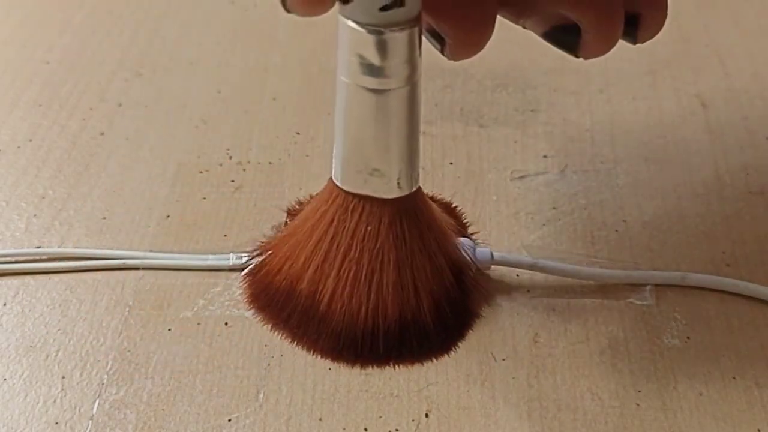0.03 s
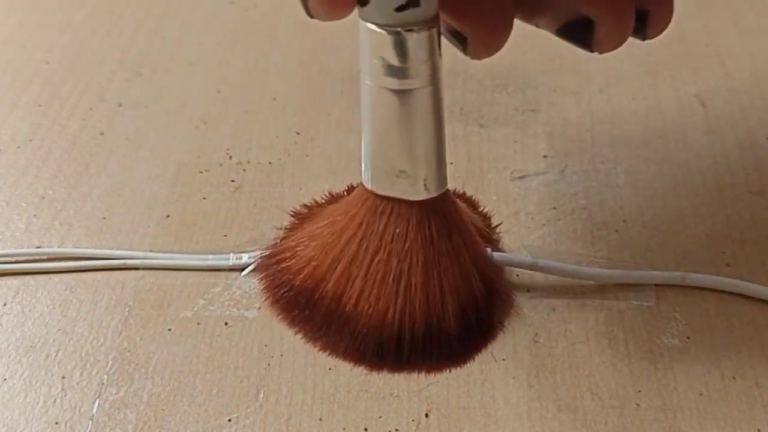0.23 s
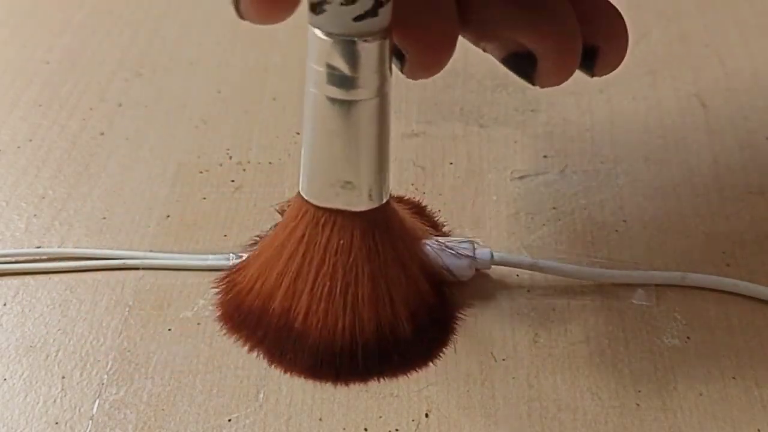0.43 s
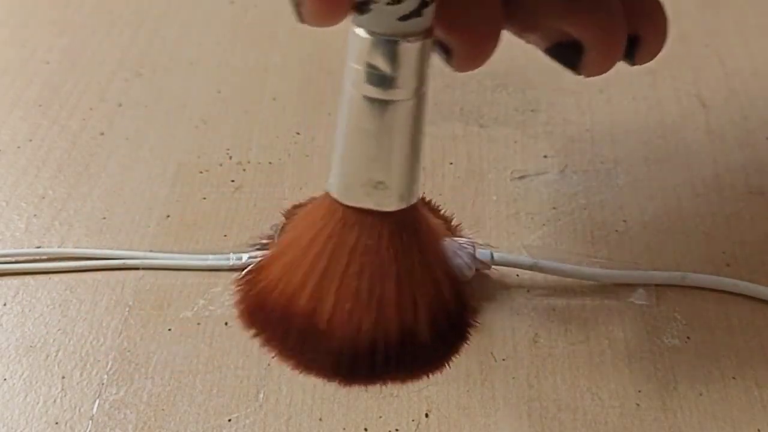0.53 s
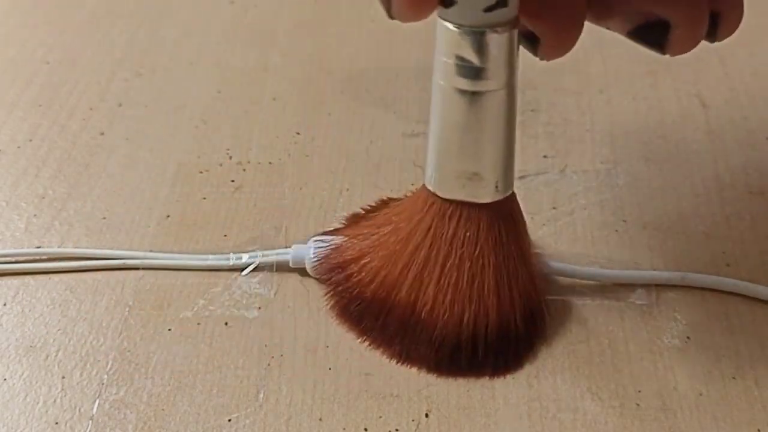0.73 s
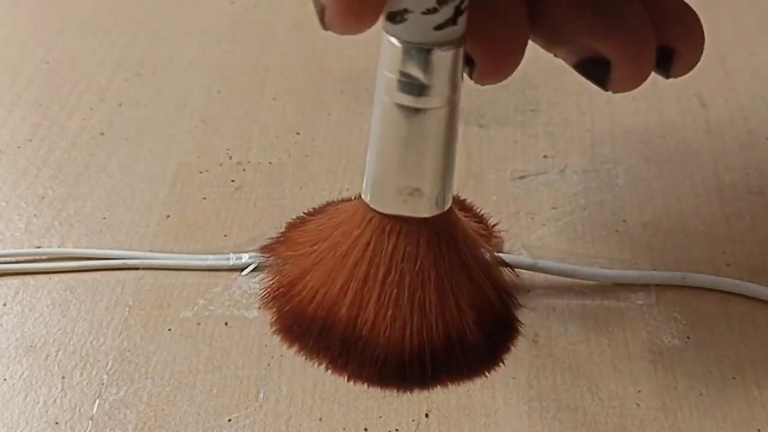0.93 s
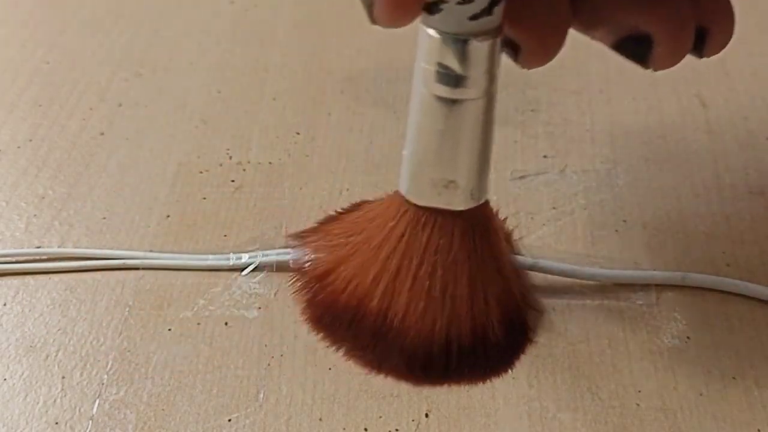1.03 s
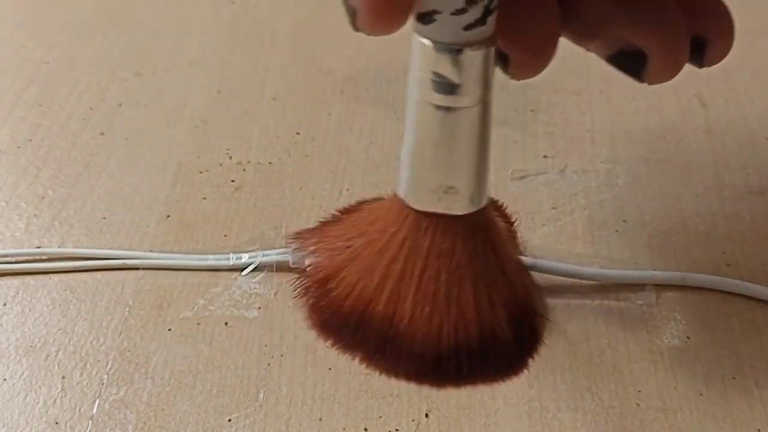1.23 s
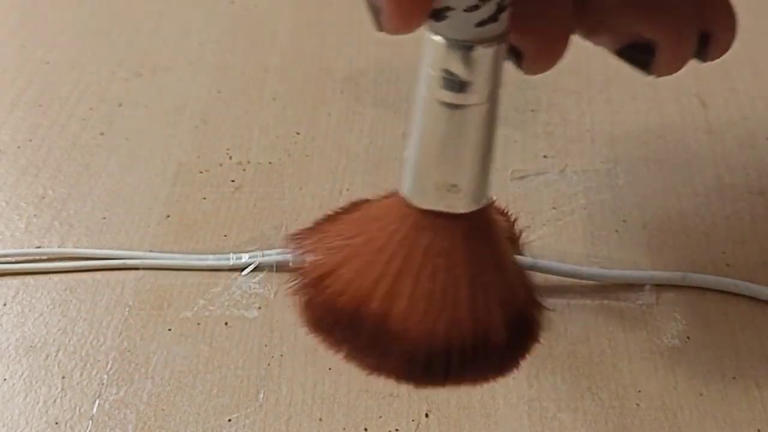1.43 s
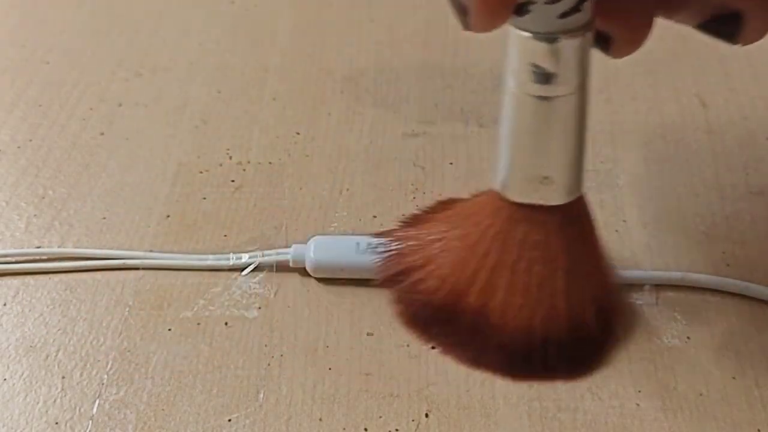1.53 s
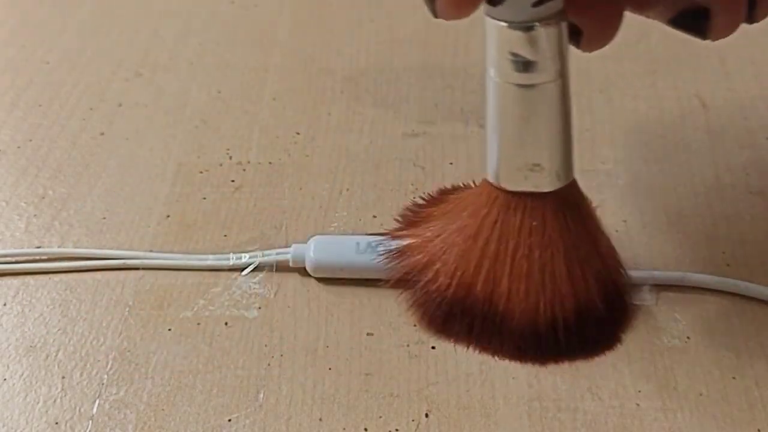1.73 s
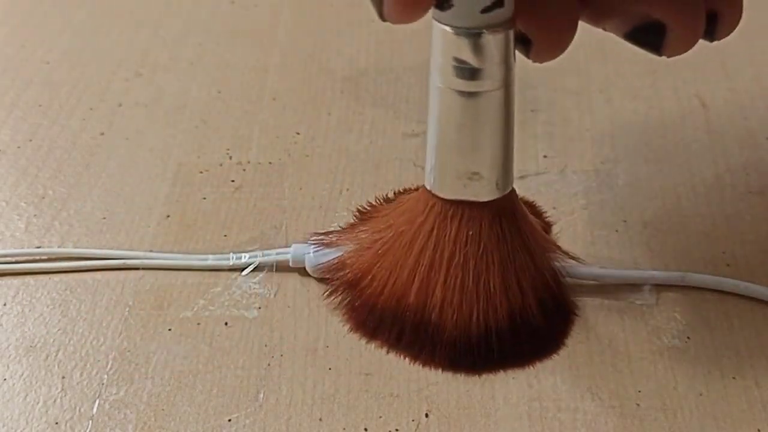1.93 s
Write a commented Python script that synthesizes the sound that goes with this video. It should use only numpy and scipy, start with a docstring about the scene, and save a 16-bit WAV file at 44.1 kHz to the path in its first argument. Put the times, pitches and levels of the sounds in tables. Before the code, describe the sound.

Soft makeup brush sweeping quickly back and forth over a small microphone, scratchy hissing strokes

```python
"""A soft makeup brush sweeps back and forth, about four strokes a second, over a small earphone-cable microphone.
Countless bristle contacts, random impulses in clumps, hiss through the microphone's port and crackle on top.
The same kind of rubbing rumbles through the housing; single bristles snap past an edge and the housing bumps.
At the last turn the bristles seem to cover the port: a cavity resonance turns the hiss hollow for a moment.
Underneath lies the microphone's faint own noise."""
import sys
import numpy as np
from scipy import signal
from scipy.fft import rfft, irfft
from scipy.io import wavfile

SR = 44100
rng = np.random.default_rng(int(sys.argv[2]) if len(sys.argv) > 2 else 0)


def file_out(sig):
    """Save sig as 16-bit WAV at sys.argv[1]."""
    # one column per channel
    cols = np.atleast_2d(sig).T
    # limit, then scale
    lim = np.clip(cols, -1, 1)
    pcm = np.round(lim * 32767).astype(np.int16)
    wavfile.write(sys.argv[1], SR, pcm)


N = 88200

# Strokes of the brush. Each row: start, fastest moment and end in seconds, hiss level and rumble level in dB,
# rasp and fizz boost in dB, fizz centre in Hz, place of the brush (0 left to 1 right),
# peakedness of the swell (exponent).
STROKES = [(-.08, 0.004, .07, -50, -47.5, -6, 1, 13500, 0, 0.82),
           (0.057, 0.174, 0.28, -35.5, -42, 2, -1, 14700, 0, 1.47),
           (.28, 0.414, 0.52, -35.2, -41.5, -1.5, 1.5, 13200, 0, 1.13),
           (0.505, 0.518, 0.57, -45.5, -46, -14, 1, 12800, 0, 1),
           (0.534, 0.661, 0.78, -32.5, -42.5, 0.5, 3.5, 14300, 0.33, 1.6),
           (0.768, 0.903, 1.016, -33, -44, 1, 1, 12700, 0.58, 2.5),
           (1.0, 1.142, 1.199, -34.5, -45, 0.5, -0.5, 12500, 0.78, 1.15),
           (1.193, 1.32, 1.44, -32.5, -43, -1.5, -1.5, 13900, 0.79, 3.43),
           (1.368, 1.403, 1.432, -40, -49, 1, -14, 13500, 0.54, 2.8),
           (1.434, 1.539, 1.705, -31.5, -43, -0.5, 1, 12000, 0.92, 1.29),
           (1.697, 1.872, 2.056, -36, -44.5, -4, 2, 12300, 0.65, 1.7)]
# Colour of the open port with the brush to its left. Each row: frequency in Hz, relative density in dB per Hz.
PORT_LEFT = [(60, -33), (200, -36), (450, -8.5), (800, -4.5), (1300, -6), (2100, -8), (2900, -2.5),
             (3550, 4.5), (4150, -2.5), (4600, -0.5), (5100, -6.5), (5750, -6), (6300, -14), (8000, -13),
             (9300, -6.5), (10500, -10), (11600, -10.5), (12400, -7.5), (13300, -0.5), (14300, -17),
             (15800, -5.5)]

# Bristle contacts: mean rate, mean of the random size, rms and bandwidth of the clumping
CONTACTS_PER_S, CONTACT_SPREAD_DB, CLUMP_DB, CLUMPS_PER_S = 16000, 3, 1.26, 85


def amp(db):
    """Level law: 20 dB is a tenfold amplitude."""
    return 10 ** (np.asarray(db) / 20)


def evened(x):
    """Power normalisation: scales to rms 1."""
    return x / np.sqrt(np.mean(x ** 2) + 1e-20)


def read(points, hz):
    """Spectral interpolation: dB values join linearly along a log-frequency axis."""
    f, value = np.transpose(points)
    return np.interp(np.log(hz + 1), np.log(f + 1), value)


def add(mix, s, sound):
    """Superposition: adds a sound to the mix, in place, at s seconds."""
    part = mix[round(s * SR):][:len(sound)]
    part += sound[:len(part)]


def bins(size=4096):
    """Discrete spectrum: absolute frequencies in Hz round the full FFT circle."""
    return abs(np.fft.fftfreq(size, 1 / SR))


def bell(x, centre, width):
    """Gaussian hump of height 1; width is its standard deviation."""
    return np.exp(-.5 * ((x - centre) / width) ** 2)


def impulse_response(db):
    """Minimum phase: the Hilbert transform of log gain on bins() gives the phase of a causal response."""
    log_spectrum = np.conj(signal.hilbert(np.log(amp(db))))
    return np.fft.ifft(np.exp(log_spectrum)).real


def coloured(x, db):
    """Linear filtering: convolves x with a colour's impulse response, at rms 1."""
    return evened(signal.fftconvolve(x, impulse_response(db))[:N])


def resonate(x, hz, width):
    """Heterodyne resonance: shifts the moving pitch hz to zero, low-passes there and shifts back."""
    turn = np.exp(2j * np.pi * np.cumsum(hz) / SR)
    r = np.exp(-np.pi * width / SR)
    return 2 * (turn * signal.lfilter([1 - r], [1, -r], x / turn + 1e-18)).real


def wander(per_s):
    """Low-passed Gaussian noise: a random drift of bandwidth per_s in Hz, at rms 1."""
    spectrum = rfft(rng.standard_normal(N))
    return evened(irfft(spectrum * bell(np.fft.rfftfreq(N, 1 / SR), 0, per_s), N))


def contacts(per_s, spread_db):
    """Shot noise: sparse impulses of random size and sign, their strength drifting in clumps."""
    size = amp(spread_db * np.minimum(rng.exponential(1, N), 5))
    sign = rng.choice([-1, 1], N)
    hit = rng.random(N) < per_s / SR
    return size * sign * hit * amp(CLUMP_DB * wander(CLUMPS_PER_S))


def speed(start, fastest, end):
    """Reciprocating motion: from rest the brush speeds up to 1 and slows to the next turn, as a half sine."""
    phase = np.interp(np.arange(N) / SR, [start, fastest, end], [0, .5, 1])
    return np.maximum(np.sin(np.pi * phase), 0)


def self_noise():
    """Transducer noise: a steady random signal with the microphone's own spectrum."""
    # Each row: frequency in Hz, relative density in dB per Hz.
    noise_colour = [(20, 3), (70, 2), (300, -23), (2000, -5), (16000, -32)]
    level_db = -73
    return amp(level_db) * coloured(rng.standard_normal(N), read(noise_colour, bins()))


def housing():
    """Structure-borne sound: rubbing shakes the plastic, a soft, uneven rumble under every stroke."""
    # Colour of the housing. Each row: frequency in Hz, relative density in dB per Hz.
    housing_colour = [(20, -5), (65, -12), (88, -8.5), (115, -2.5), (180, -1), (270, 0.5), (350, -3),
                      (550, -7), (1000, -11), (3000, -21.5), (16000, -83)]
    handling_db, speed_power = -60.5, 0.91  # steady level; how the rumble follows the brush's speed
    uneven_db, uneven_per_s = 0.5, 20
    level = amp(handling_db)
    for start, fastest, end, _, rumble_db, *_ in STROKES:
        level = level + amp(rumble_db) * speed(start, fastest, end) ** speed_power
    rub = contacts(CONTACTS_PER_S, CONTACT_SPREAD_DB) * amp(uneven_db * wander(uneven_per_s))
    return level * coloured(rub, read(housing_colour, bins()))


def bumps():
    """Damped vibration: the housing, nudged against the table, rings briefly as a decaying sine."""
    # Each row: start in seconds, level in dB (before the decay and rise), pitch in Hz,
    # time to decay by 60 dB in seconds.
    bump_rows = [(0.155, -30, 202, 0.046), (.625, -23, 700, 0.0096), (.648, -34.5, 126, .07),
                 (1.281, -29, 224, 0.019), (1.3137, -16, 547, 0.015), (1.58, -21.5, 470, 0.0088),
                 (1.655, -30, 776, 0.045), (1.717, -40, 146, 0.048)]
    rise_s = 0.00047
    out, t = np.zeros(N), np.arange(SR // 10) / SR
    for s, db, hz, t60 in bump_rows:
        envelope = np.exp(-np.log(1000) * t / t60) * (1 - np.exp(-t / rise_s))
        add(out, s, amp(db) * envelope * np.sin(2 * np.pi * hz * t))
    return out


def snaps():
    """Impulsive release: a single bristle snaps past an edge, a click with a short decaying scrape."""
    # Each row: start in seconds, peak level in dB, centre in Hz, width (standard deviation) in octaves,
    # length of the scrape in seconds (its amplitude falls by e squared).
    snap_rows = [(.066, -31, 5000, 1.2, .001), (.1095, -25, 14500, 0.46, .002),
                 (.157, -21, 14000, .3, .002), (0.1911, -14.5, 13900, 0.47, 0.00084),
                 (0.243, -17.5, 10700, 3.6, 0.00054), (.3222, -19.5, 5000, 0.58, 0.00019),
                 (.3475, -24.5, 12000, 0.84, .002), (0.374, -25, 4000, 0.91, 0.00087),
                 (.395, -16.5, 7950, 1.3, .001), (.523, -21.5, 9050, 1.7, 0.0023),
                 (.565, -27.5, 12000, 0.43, .001), (.6246, -13.5, 2550, 0.66, 0.0018),
                 (0.629, -17, 2200, 1.6, .001), (0.635, -26, 2980, 1.2, 0.0037),
                 (.640, -31, 3220, 0.89, 0.0025), (0.6481, -16.5, 2730, 0.82, 0.0015),
                 (.8676, -24, 4000, 0.94, .001), (1.2994, -8, 5200, 0.9, 0.00023),
                 (1.2995, -18, 13300, 0.32, .0005), (1.357, -38, 5000, 0.91, .002),
                 (1.469, -17, 9000, 2.1, 0.00092), (1.4916, -22, 6050, 1, .001),
                 (1.582, -22.5, 2530, 1.9, 0.002), (1.672, -32, 6800, 0.36, 0.0013),
                 (1.743, -30, 12800, .2, 0.0071), (1.779, -25.5, 4600, 0.34, .002),
                 (1.7933, -19.5, 3550, 1, 0.00068), (1.942, -27, 7000, 0.81, 0.0023),
                 (1.975, -52, 5100, 1.4, 0.0046)]
    floor_db, scrape_db = -27, -13.5  # broadband floor against the hump; scrape against the first snap
    out, hz, t = np.zeros(N), bins(), np.arange(SR // 10) / SR
    for s, db, centre_hz, octaves, length in snap_rows:
        grit = rng.standard_normal(len(t))
        scrape = amp(scrape_db) * grit * np.exp(-2 * t / max(length, 1 / SR))
        slip = (t == 0) + scrape
        shape = amp(floor_db) + bell(np.log2(hz + 1), np.log2(centre_hz), octaves)
        colour = 20 * np.log10(shape) + .5 * read(PORT_LEFT, hz)  # half of the port's colour, in dB
        snap = signal.fftconvolve(slip, impulse_response(colour))
        add(out, s, amp(db) * snap / abs(snap).max())
    return out


def cover():
    """Changing aperture: covered share of the port, cavity pitch and cavity gain at every sample."""
    # Each row: time in seconds, share of the port covered 0-1, cavity resonance in Hz, its level in dB.
    cover_rows = [(1.624, 0, 3000, -34), (1.645, 0, 2520, -45), (1.65, 0.2, 950, -47),
                  (1.657, 0.9, 760, -42.5), (1.69, 0.86, 680, -51.5), (1.725, 0.84, 710, -62),
                  (1.747, 1, 770, -48.5), (1.815, .9, 790, -47.5), (1.851, 1, 870, -36),
                  (1.875, 0.9, 937, -44.5), (1.882, 0.04, 2300, -34), (1.895, 0.4, 3000, -60)]
    t = np.arange(N) / SR
    s, share, hz, db = np.transpose(cover_rows)
    shut = np.interp(t, s, np.clip(share, 0, 1), 0, 0)
    gain = amp(np.interp(t, s, db)) * (t > s[0]) * (t < s[-1])
    return shut, np.interp(t, s, hz), gain


def cavity():
    """Cavity resonance: the port's pitch drops and narrows as it is covered, rises and blurs as it opens."""
    tight_width_hz, leaky_width_hz = 420, 1060  # bandwidth of each of two passes
    shut, hz, gain = cover()
    drive = contacts(CONTACTS_PER_S, CONTACT_SPREAD_DB)
    tight = evened(resonate(resonate(drive, hz, tight_width_hz), hz, tight_width_hz))
    leaky = evened(resonate(resonate(drive, hz, leaky_width_hz), hz, leaky_width_hz))
    return gain * (shut * tight + (1 - shut) * leaky)


def crackle(force):
    """Sparse shot noise: stiffer bristles crackle, rising less than in proportion to the force."""
    # Each row: frequency in Hz, relative density in dB per Hz.
    crackle_colour = [(100, -11), (1000, -8.5), (2400, -11), (4000, 5), (7000, -5.5), (10000, -7.5),
                      (13200, 4.5), (16000, -2)]
    level_db, per_s, spread_db, force_power = -49.5, 450, 3.5, 0.46
    grains = coloured(contacts(per_s, spread_db), read(crackle_colour, bins()))
    return amp(level_db) * evened(force ** force_power) * grains


def bristles():
    """Frictional noise: contacts hiss through the open or covered port, louder and brighter with speed."""
    # Open port with the brush to its right. Each row: frequency in Hz, relative density in dB per Hz.
    port_right = [(60, -18), (200, -19), (450, -13), (800, -3.5), (1500, -4), (2300, -3), (2900, 1.5),
                  (3450, 2.5), (4200, -2.5), (4700, 1), (5050, -15.5), (6100, -7), (6700, -12.5),
                  (7600, -12.5), (8700, -9), (10200, -14.5), (11400, -7.5), (12000, -3), (12650, -2),
                  (13500, -8), (14200, -11), (15800, -17)]
    # Covered port. Each row: frequency in Hz, relative density in dB per Hz.
    covered_colour = [(60, -35), (400, -3), (1100, -36), (1700, -20), (2600, -10.5), (3700, -1.5),
                      (4350, 8.5), (4900, -2), (5400, -10), (6100, 2), (7000, -13), (7600, -10),
                      (8300, -3.5), (9700, -16), (11200, -5.5), (12200, 2), (13300, -9), (14200, -3),
                      (15800, -23)]
    covered_db = -1  # against the force of the strokes
    settle_db, settle_per_s, settle_spread_db = -54.5, 5800, 4  # steady background creep of the bristles
    rasp_hz, rasp_width_hz, fizz_width_hz = 2140, 580, 1700
    slow_dull_db, dull_hz, dull_width_hz = -3.5, 9800, 3700  # slow bristles lose the upper treble

    hz = bins()
    drive = contacts(CONTACTS_PER_S, CONTACT_SPREAD_DB)
    left, right = read(PORT_LEFT, hz), read(port_right, hz)
    dull = slow_dull_db * bell(hz, dull_hz, dull_width_hz)
    settling = contacts(settle_per_s, settle_spread_db)
    hiss = amp(settle_db) * coloured(settling, (left + right) / 2 + dull)
    force = np.full(N, amp(settle_db))
    for start, fastest, end, db, _, rasp_db, fizz_db, fizz_hz, place, peakedness in STROKES:
        pace = speed(start, fastest, end)
        level = amp(db) * pace ** peakedness
        colour = left + place * (right - left)
        colour = colour + rasp_db * bell(hz, rasp_hz, rasp_width_hz)
        colour = colour + fizz_db * bell(hz, fizz_hz, fizz_width_hz)
        fast, slow = coloured(drive, colour), coloured(drive, colour + dull)
        hiss = hiss + level * (pace ** 2 * fast + (1 - pace ** 2) * slow)
        force = np.hypot(force, level)  # powers add
    shut = cover()[0]
    covered = force * amp(covered_db) * coloured(drive, read(covered_colour, hz))
    return crackle(force) + (1 - shut) * hiss + shut * covered


def scene():
    """Near field: everything happens right on the microphone, so the sources add with no room."""
    return (housing() + bumps() + snaps() + cavity() + bristles())[None]


def record(dry):
    """Band limitation: the microphone's low cut, its own noise, then a linear-phase treble limit."""
    low_cut_hz, edge_hz = 106.6, 15820
    low_cut = signal.butter(5, low_cut_hz, "highpass", fs=SR, output="sos")
    heard = signal.sosfilt(low_cut, dry) + self_noise()
    band_limit = signal.firwin(1023, edge_hz, window=("kaiser", 9), fs=SR)
    return signal.oaconvolve(heard, band_limit[None], "same")


dry = scene()
out = record(dry)
file_out(out)
```